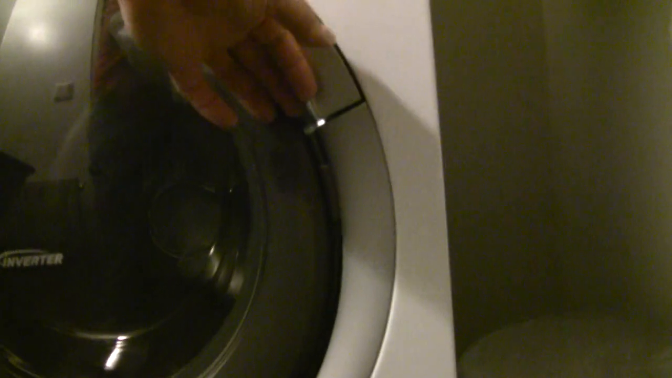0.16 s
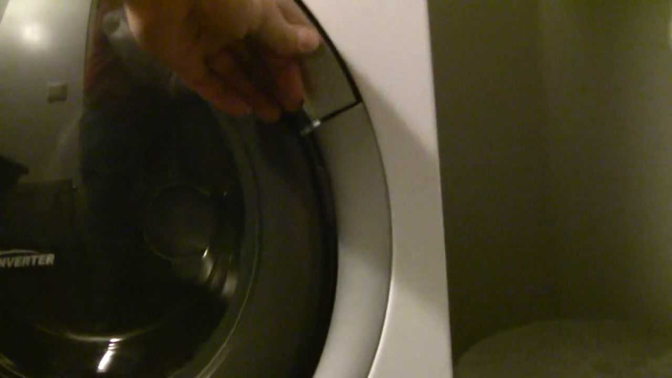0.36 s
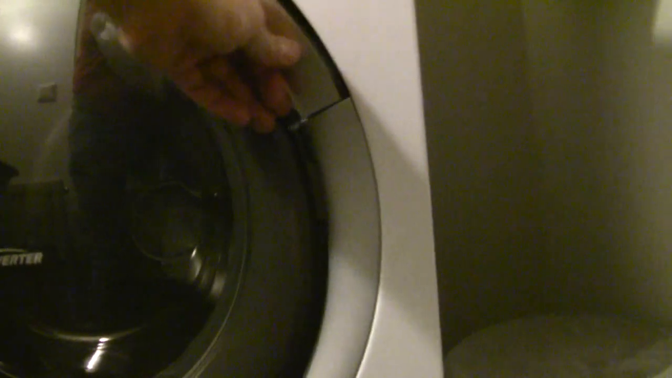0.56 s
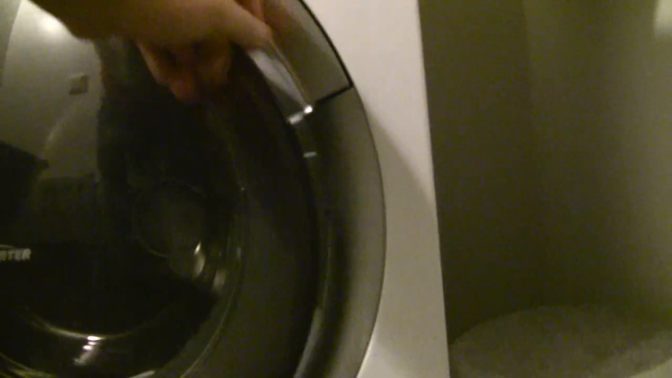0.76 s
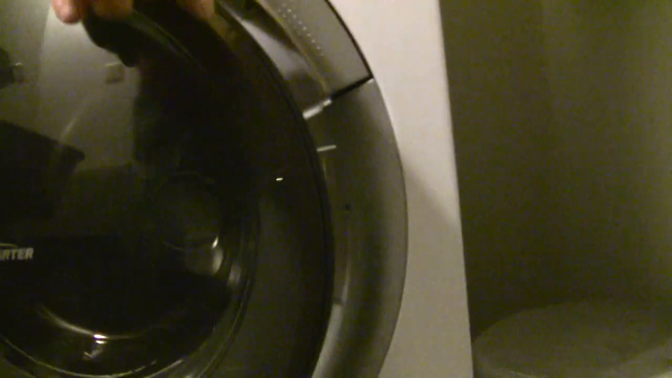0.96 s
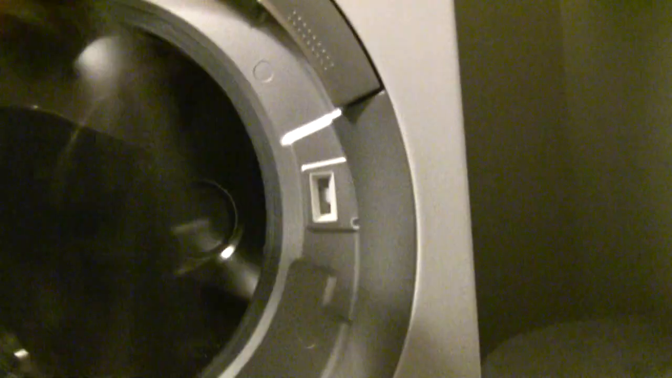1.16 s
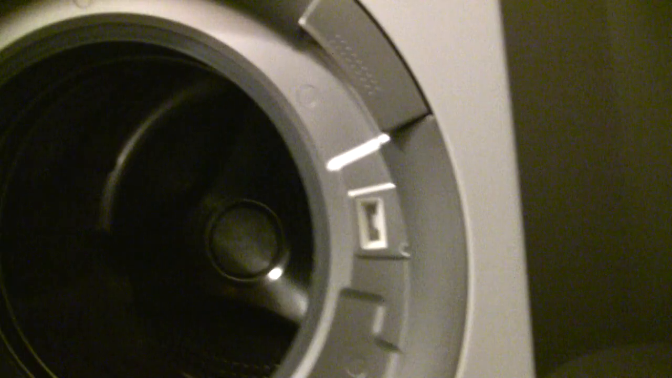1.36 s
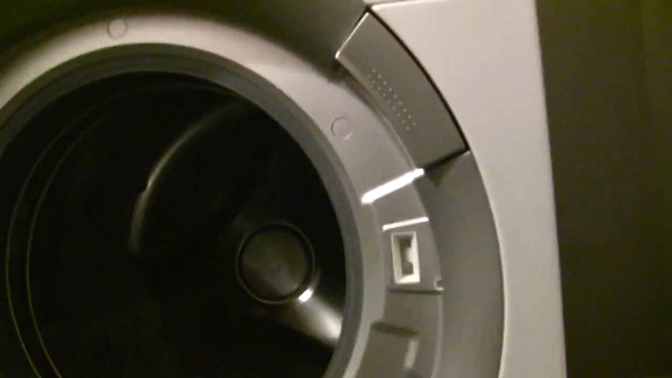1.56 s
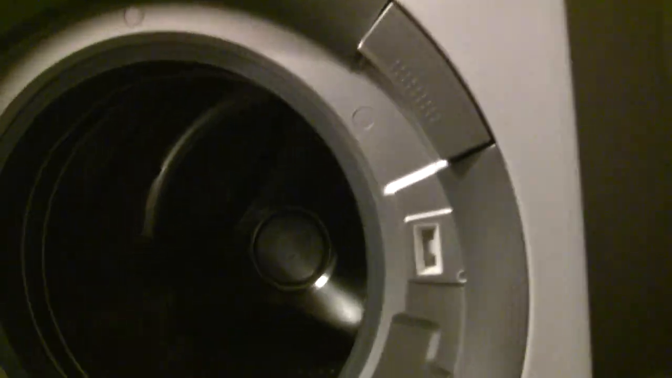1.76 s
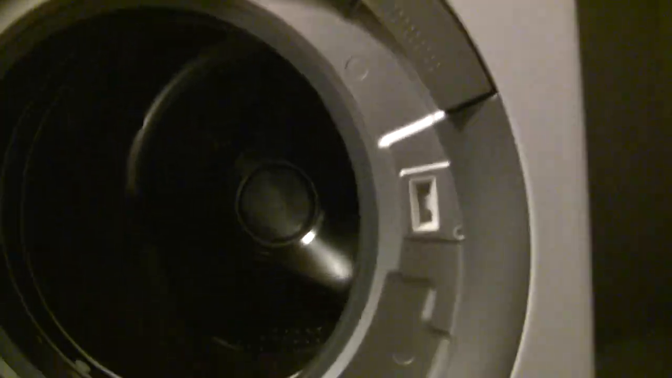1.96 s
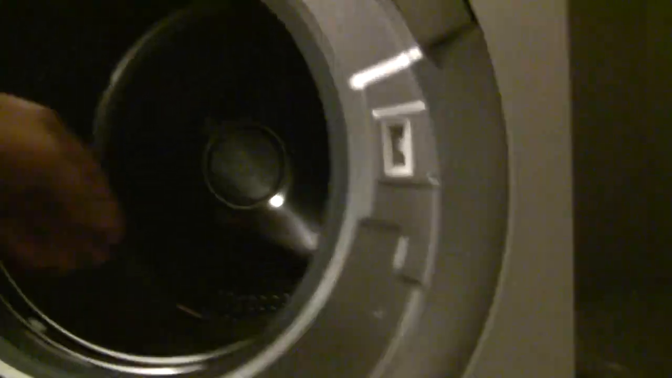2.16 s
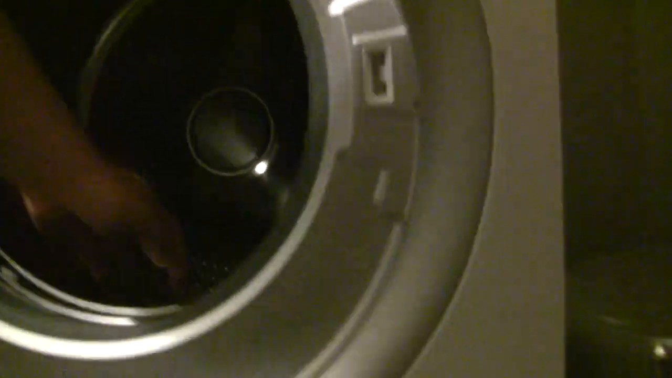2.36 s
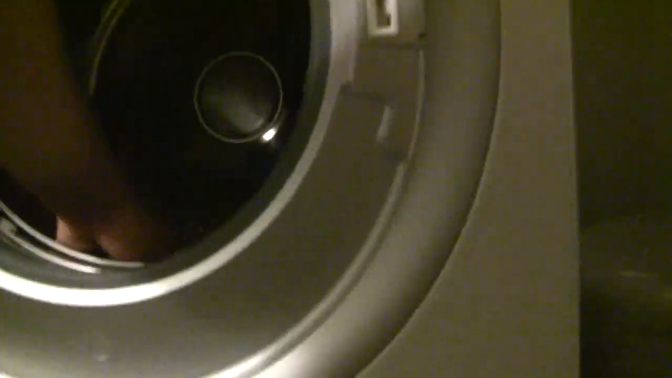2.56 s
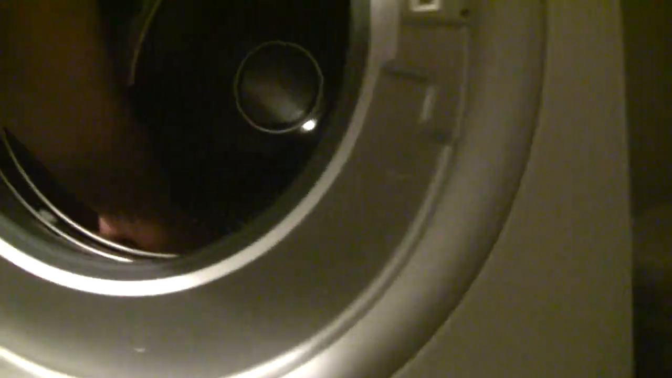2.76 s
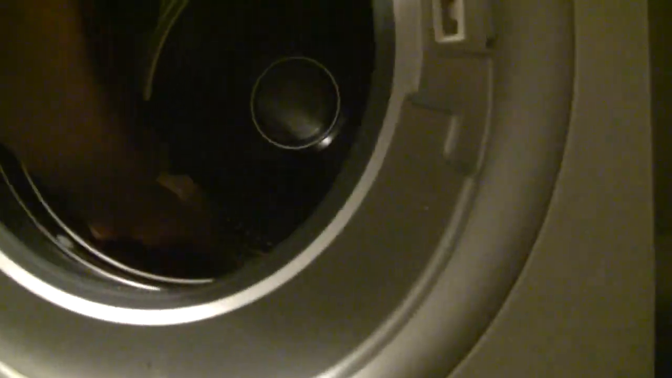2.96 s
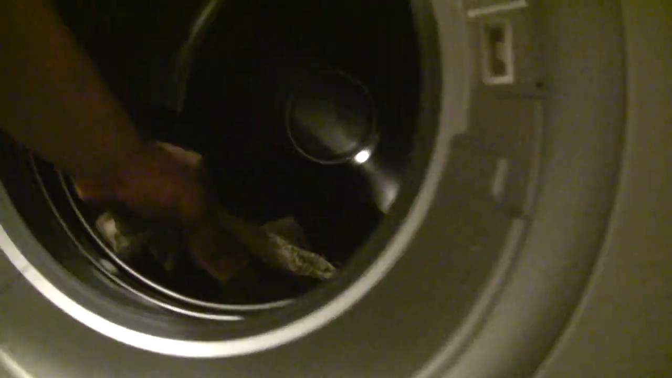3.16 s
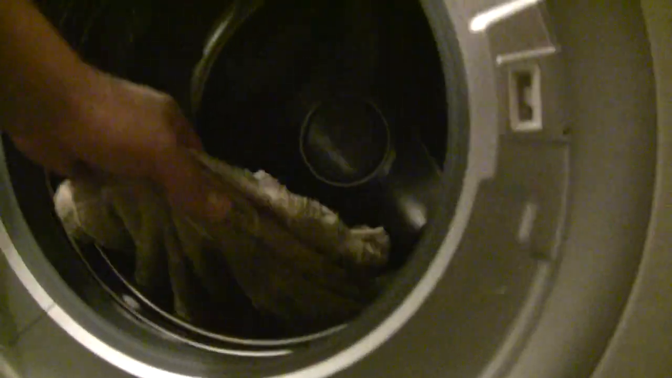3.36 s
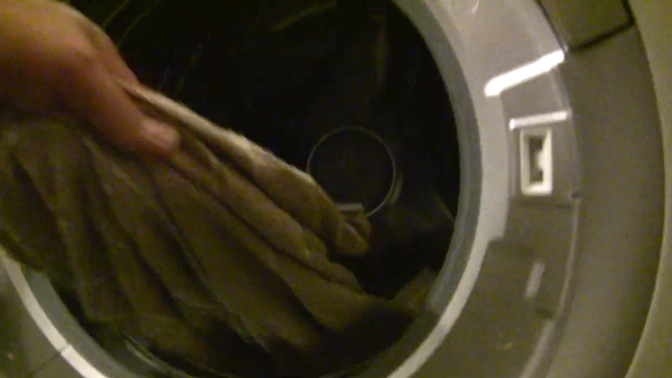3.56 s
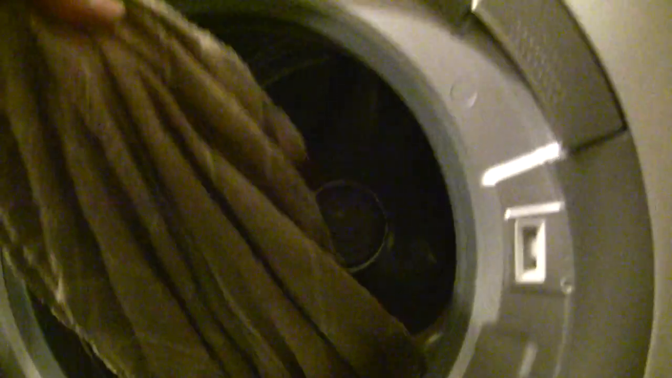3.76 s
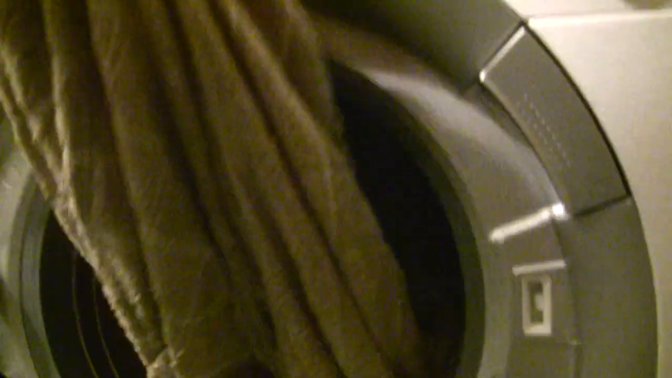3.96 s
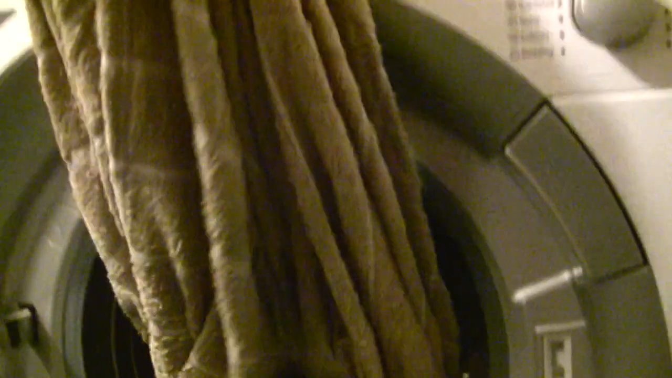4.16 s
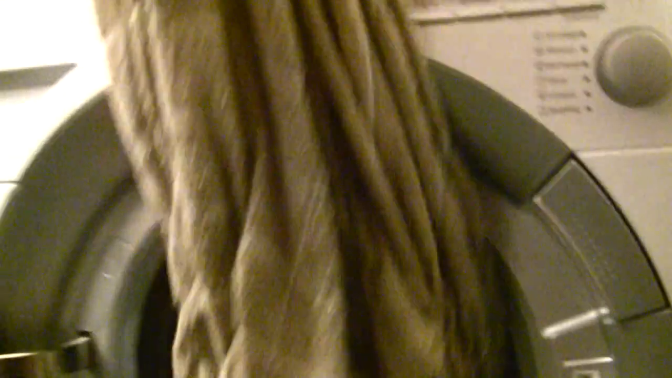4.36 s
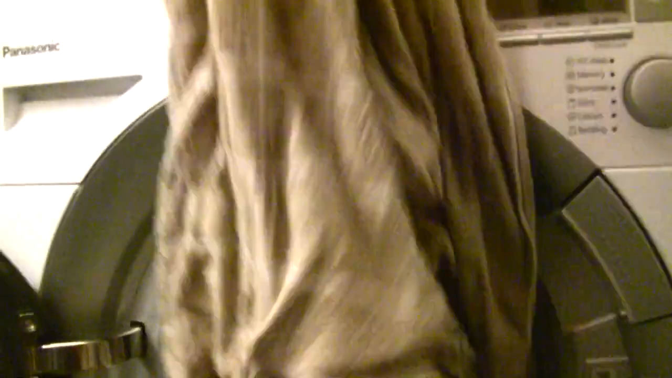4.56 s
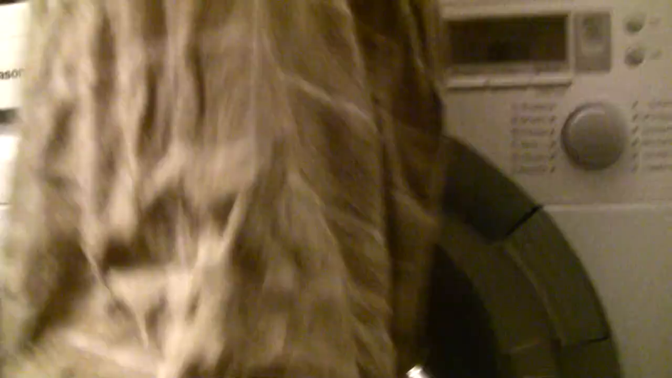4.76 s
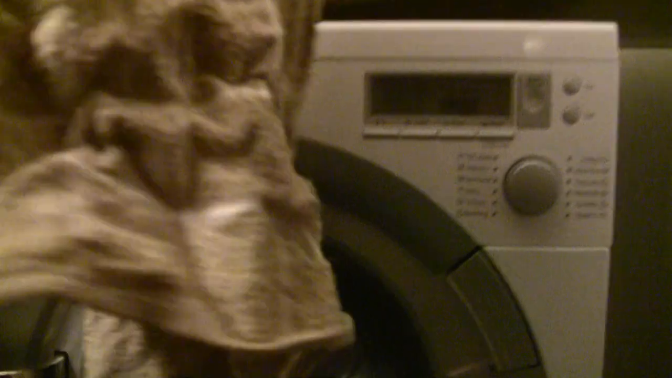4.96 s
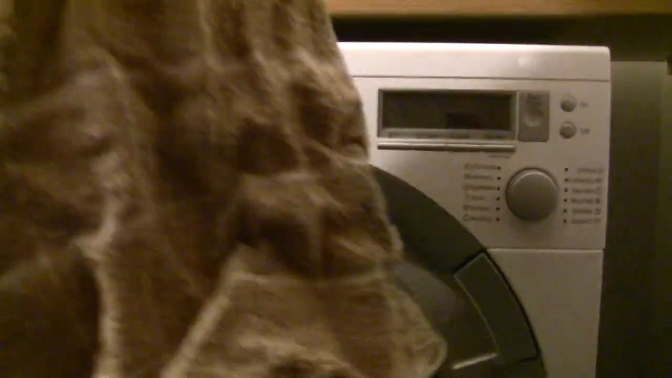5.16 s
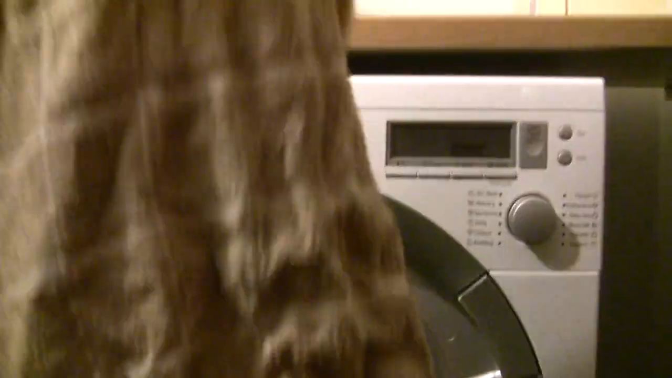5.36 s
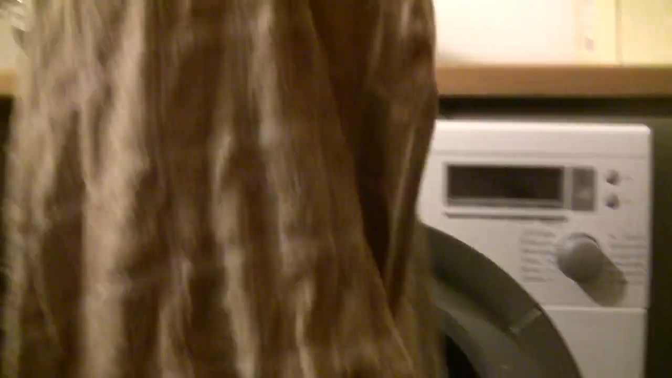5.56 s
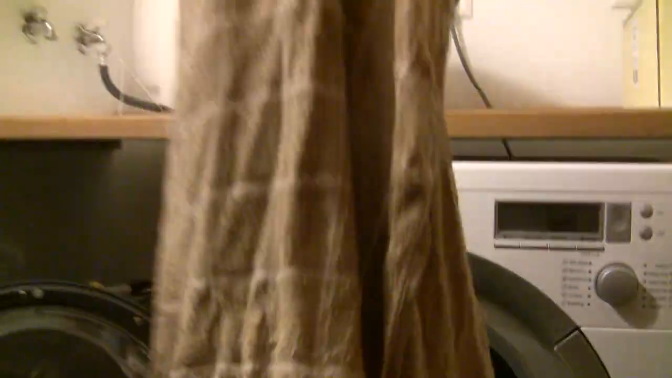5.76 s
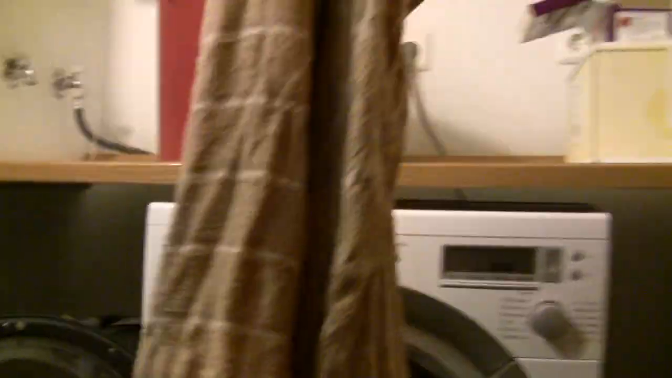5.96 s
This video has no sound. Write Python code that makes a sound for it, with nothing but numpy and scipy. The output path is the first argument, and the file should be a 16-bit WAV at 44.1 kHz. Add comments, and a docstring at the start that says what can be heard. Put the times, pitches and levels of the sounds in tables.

```python
"""Opening a washing machine

In a small laundry room with hard walls, a washing machine door is opened close to the microphone.
The handle spring ticks, the latch hook snaps back, the door bumps and its glass leaves the rubber seal.
A hand knocks about in the steel drum. Every blow makes the struck part ring and the room echo.
Then a sheet is drawn out: it swishes against itself, rubs over the rim and flaps."""
import sys
import numpy as np
from scipy import signal
from scipy.fft import rfft, irfft, next_fast_len
from scipy.io import wavfile

SR = 44100
rng = np.random.default_rng(int(sys.argv[2]) if len(sys.argv) > 2 else 0)


def generate_wav(sig):
    """Save sig (samples, or channels by samples) to the path in sys.argv[1] as 16-bit PCM at SR."""
    pcm = np.round(np.clip(np.atleast_2d(sig).T, -1, 1) * 32767).astype(np.int16)
    wavfile.write(sys.argv[1], SR, pcm)


N = 265305
TIME = np.arange(N) / SR

# The notes of the steel drum. Each row: pitch in Hz, level in dB, ring time in seconds.
DRUM_NOTES = [(70.4, 17.5, 0.49), (81.4, 6, 0.57), (224, 3, 0.14), (247.6, 3, 0.34), (278.6, 4.5, 0.26),
              (370.5, -3, 0.26), (484.5, 6.5, 0.27), (549, -9, 0.26), (688, -4, 0.42), (934, -4, 0.078),
              (1137, 2, 0.12), (1266, -7.5, 0.22), (1382, -8, 0.14), (1579, 0, 0.12), (2420, -4, 0.08)]


def latch_hook():
    """The latch lets go and its hook snaps back in a quick run of ringing clicks."""
    # Each row: start and contact time in seconds, then echo, strength, thump and brightness in dB.
    snaps = [(0.7063, 0.0045, -2.5, -32, -5, -1), (0.7094, 0.0019, -2, -23.5, 2.5, 0.5),
             (0.7123, 0.0016, -2, -24, 3.5, 0), (0.863, 0.0055, -5, -37.5, -21, -7)]
    # Each row: pitch in Hz, level in dB, ring time in seconds.
    notes = [(1146, 1.5, 0.11), (1430, -6, 0.092), (1620, 2, 0.22), (1668, 5, 0.07), (1714, 6, 0.21),
             (1920, -7.5, 0.53), (1880, -3, 0.18), (2990, -4, 0.059), (3456, -17, 0.21), (3670, -13, 0.24),
             (4550, -16, 0.11), (5810, -6, .11)]
    # Each row: frequency in Hz, level in dB.
    tone = [(72, -32), (210, -31), (550, -14), (1340, 0), (3200, -4.5), (7100, -13.5), (12600, -29)]
    return blows(snaps, notes, tone, gain_db=2.0, ring_db=3, rise_s=0.0012, grit=0.17)


def handle_spring():
    """The spring in the handle ticks once and rings brightly."""
    # Each row: start and contact time in seconds, then echo, strength, thump and brightness in dB.
    ticks = [(0.3905, 0.0056, -2, -27, -1, 0.5)]
    # Each row: pitch in Hz, level in dB, ring time in seconds.
    notes = [(805, 1, 0.14), (2030, -7, 0.19), (2280, -4, 0.33), (2780, -8, 0.17), (3730, -24, .35),
             (4075, -12, 0.19), (5400, -23, .14), (6170, -28, .18), (7360, -23, 0.2), (7900, -11, 0.15),
             (8500, -8, 0.12), (8950, -9, 0.13), (9450, -8, 0.12)]
    # Each row: frequency in Hz, level in dB.
    tone = [(72, -30), (210, -45), (550, -14.5), (1340, -11), (3200, -4), (7100, 0), (12600, -12)]
    return blows(ticks, notes, tone, gain_db=0.5, ring_db=6, rise_s=0.00038, grit=0.22)


def door():
    """The door bumps and rings with low notes."""
    # Each row: start and contact time in seconds, then echo, strength, thump and brightness in dB.
    bumps = [(0.089, 0.012, -16, -51, 12, -8), (0.172, 0.0063, -4, -56, 13, -1),
             (0.4977, 0.0038, -4, -19.5, -3, -0.5), (0.634, 0.017, 29, -42.5, 7, -7.5),
             (0.783, 0.018, 2, -37.5, 4.5, -21), (0.9092, 0.012, -2, -33.5, -2, -3.5),
             (1.17, 0.02, 2, -60, 18, -10), (1.361, 0.0096, -3, -57.5, 22.5, -31),
             (1.757, 0.003, -6, -46.5, 4, -35)]
    # Each row: pitch in Hz, level in dB, ring time in seconds.
    notes = [(84.4, 12.5, 0.43), (219, 13, 0.43), (246, 15, 0.24), (301.6, 7.5, 0.5), (375.3, 7, 0.29),
             (409.4, 5, 0.21), (565, 3.5, 0.25), (686, 2.5, 0.19), (758, 1, 0.18), (1024, 2, 0.12),
             (1235, 0.5, 0.18), (1304, 1, 0.29), (1362, 5, 0.051), (1574, -6.5, 0.35)]
    # Each row: frequency in Hz, level in dB.
    tone = [(72, -13.5), (210, -10.5), (550, -3), (1340, -0.5), (3200, -4.5), (7100, -7.5), (12600, -9)]
    return blows(bumps, notes, tone, gain_db=0.5, ring_db=-2, rise_s=0.00041, grit=0.36)


def rubber_seal():
    """The rubber groans as it unsticks, then the glass bowl of the door leaves it with a thud."""
    # Each row: start and contact time in seconds, then echo, strength, thump and brightness in dB.
    thuds = [(0.939, 0.01, -7, -24, 0.5, 6), (0.976, 0.011, -2, -44.5, 11.5, 1)]
    # Each row: pitch in Hz, level in dB, ring time in seconds.
    notes = [(86, 12, 0.52), (217.7, -1, 0.62), (304.7, 0.5, 0.34), (409, -8, 0.83), (487, 4, 0.058),
             (531, 3.5, 0.14), (662, 2, 0.13)]
    # Each row: frequency in Hz, level in dB.
    tone = [(72, -19.5), (210, -8.5), (550, -1), (1340, -17), (3200, -36), (7100, -43), (12600, -47)]
    groan = resonance(hz=129, width_hz=24, db=-37.5) * swell(peak_s=0.675, rise_s=0.046)
    return groan + blows(thuds, notes, tone, gain_db=1.5, ring_db=3.5, rise_s=0.0025, grit=0.3)


def hand_in_drum():
    """A hand knocks against the steel drum and sets it ringing."""
    # Each row: start and contact time in seconds, then echo, strength, thump and brightness in dB.
    knocks = [(2.063, 0.012, 2, -40.5, 3, -4), (2.436, 0.012, 7, -48, -1.5, -21),
              (2.582, 0.0098, -3, -51.5, -12, 4), (2.6869, 0.0053, -1.5, -20, -0.5, 1),
              (2.706, 0.0065, -6, -31.5, 12, -14), (2.738, 0.0083, -12, -47, 13, -4),
              (2.827, 0.0036, -7, -38, -4, -5), (2.842, 0.017, -2, -36, 8.5, -22),
              (3.134, 0.0096, -1, -38, 3.5, -13), (3.23, 0.016, 7, -67, 20, 23),
              (3.46, 0.011, -7, -54.5, 9, -13), (4.301, 0.0078, 2, -51, 3, -13),
              (4.32, 0.018, -4, -57.5, 18, -7)]
    # Each row: frequency in Hz, level in dB.
    tone = [(72, -9), (210, -1.5), (550, -1.5), (1340, -0.5), (3200, -8), (7100, -12.5), (12600, -21.5)]
    return blows(knocks, DRUM_NOTES, tone, gain_db=1, ring_db=2.5, rise_s=0.0011, grit=0.33)


def sliding_cloth():
    """Sleeve and sheet swish as they slide, and their fine fibres add a high sizzle."""
    # Steady sliding. Each row: time in seconds, swish in dB, sizzle in dB.
    slide = [(1.1, -71, -71), (1.9, -64, -71), (2.3, -56, -67), (2.65, -55, -68), (3.05, -58, -63.5),
             (3.4, -61, -66), (3.52, -55.5, -57), (4.05, -58, -58.5), (4.35, -53.5, -61),
             (4.65, -49.5, -56), (4.82, -60, -64.5), (5.2, -72.5, -80), (6.0, -55.5, -64)]
    # Quick strokes of cloth on cloth. Each row: peak and rise time in seconds, swish and sizzle in dB.
    strokes = [(1.215, 0.05, -56.5, -63), (1.58, 0.035, -55, -70), (1.82, 0.031, -54.5, -70),
               (2.145, 0.055, -52, -57), (4.225, 0.046, -48.5, -54), (4.51, 0.039, -52.5, -64),
               (4.72, 0.034, -50.5, -50.5), (4.99, 0.074, -58, -62.5), (5.395, 0.042, -55.5, -60),
               (5.67, 0.077, -57, -71), (5.917, 0.022, -49, -54)]
    # Each row of both tones: frequency in Hz, level in dB.
    swish_tone = [(600, -17), (1400, 0), (2500, -2.5), (4200, -4.5), (6200, -5.5), (8000, -12.5),
                  (11000, -13.5), (15500, -29)]
    sizzle_tone = [(4000, -29), (7500, 3), (9000, 1), (12000, 2), (15500, -0.5)]
    swish = friction(swish_tone, flutter_db=1.7, flutter_rate=55, grain=0.25)
    swish *= np.hypot(fader(slide, column=1), swells(strokes, column=2))
    sizzle = friction(sizzle_tone, flutter_db=1.0, flutter_rate=130, grain=0.45)
    sizzle *= np.hypot(fader(slide, column=2), swells(strokes, column=3))
    return gain(1.5) * swish + sizzle


def dragging_sheet():
    """The sheet rubs on the drum and rim, while its loose folds flap and push the air."""
    # Steady dragging. Each row: time in seconds, level in dB.
    drag_levels = [(3.0, -55.5), (3.35, -54.5), (3.75, -50.5), (4.05, -56.5), (4.28, -52), (4.55, -47.5),
                   (4.78, -53.5), (5.1, -71), (6.0, -60)]
    # Folds slip over the rim. Each row: peak and rise time in seconds, rubbing and flapping in dB.
    folds = [(4.355, 0.029, -46.5, -57), (4.485, 0.038, -42.5, -43.5), (4.565, 0.027, -49, -43.5),
             (4.635, 0.034, -43.5, -50), (5.77, 0.025, -59, -51.5)]
    # Each row of both tones: frequency in Hz, level in dB.
    rub_tone = [(200, 0.5), (350, 0), (450, 3), (720, 5), (1000, -1.5), (1330, 1), (1800, -16), (3500, -28),
                (8000, -56)]
    flap_tone = [(35, -22), (65, -16), (95, 4), (165, -12.5), (240, -1), (330, -6.5), (600, -12),
                 (2000, -80)]
    drag = fader(drag_levels, column=1)
    rub = friction(rub_tone, flutter_db=2.5, flutter_rate=70, grain=0.61)
    rub *= np.hypot(drag, swells(folds, column=2))
    flap = friction(flap_tone, flutter_db=0.0, flutter_rate=25, grain=0.18)
    flap *= np.hypot(gain(-1.5) * drag, swells(folds, column=3))
    return rub + gain(-1) * flap


def hem_on_drum():
    """The hem of the sheet taps the drum, which rings softly."""
    # Each row: start and contact time in seconds, then echo, strength, thump and brightness in dB.
    taps = [(3.7, 0.011, -4, -42, 4, -15), (3.775, 0.016, 0, -36.5, -1.5, 0),
            (3.842, 0.014, -6, -43.5, 8, 10), (3.86, 0.0082, -9, -47, 5, -6)]
    # Each row: frequency in Hz, level in dB.
    tone = [(72, -15), (210, -19), (550, -1), (1340, -6), (3200, -11), (7100, -30), (12600, -31)]
    return blows(taps, DRUM_NOTES, tone, gain_db=0.5, ring_db=-2, rise_s=0.00085, grit=0.57)


def hem_on_plastic():
    """The hem flicks the plastic front, which hardly rings."""
    # Each row: start and contact time in seconds, then echo, strength, thump and brightness in dB.
    flicks = [(3.497, 0.0046, -4, -54, 8, 3.5), (5.352, 0.0012, -7, -53, -4, -13),
              (5.5672, 0.0014, -11, -47, 3, -1.5), (5.64, 0.016, -3, -55, -2, -3),
              (5.905, 0.013, -4, -53.5, -6, 4)]
    # Each row: pitch in Hz, level in dB, ring time in seconds.
    notes = [(810, -6, 0.049), (1830, -8, 0.022), (2770, 2, 0.019)]
    # Each row: frequency in Hz, level in dB.
    tone = [(72, -24), (210, -14), (550, -6), (1340, 0), (3200, 0), (7100, -5.5), (12600, -13)]
    return blows(flicks, notes, tone, gain_db=0.5, ring_db=-1, rise_s=0.0013, grit=0.15)


def fingers():
    """Fingers rub the plastic handle twice and bring out its hollow tone."""
    hollow = resonance(hz=254, width_hz=63, db=-41.5) + resonance(hz=432, width_hz=180, db=-50.5)
    return hollow * np.hypot(swell(peak_s=0.025, rise_s=0.048, db=2), swell(0.12, 0.02, db=-2))


def singing_steel():
    """The drum sings faintly under the sliding cloth, and the rim rings as the sheet leaves it."""
    # Each row: pitch in Hz, width in Hz, level in dB.
    notes = [(1305, 170, -68.5), (2974, 150, -71.5), (3726, 260, -65)]
    # How firmly the cloth touches the drum. Each row: time in seconds, level in dB.
    contact = [(2.9, -2), (3.2, 0.5), (3.6, 1.5), (4.05, 2), (4.5, -12), (4.8, -5), (5.0, -23), (5.2, -60)]
    drum = sum(resonance(*note) for note in notes) * fader(contact, column=1)
    rim = resonance(hz=1236, width_hz=18, db=-58) * swell(peak_s=4.77, rise_s=0.09)
    return drum + rim


def room_echo(t, build_s=0.0055):
    """Many reflections off near walls blur together; the treble comes back weaker and dies first."""
    # Each row: frequency in Hz, seconds the echo takes to fall by 60 dB.
    fade_times = [(60, 0.99), (160, 0.3), (420, 0.46), (1100, 0.28), (2900, 0.25), (7700, 0.25),
                  (15000, 0.19)]
    # What the walls send back. Each row: frequency in Hz, level in dB.
    wall_tone = [(500, 1), (4000, -2), (9000, -5.5), (12000, -3.5), (16000, -19.5)]
    hz = np.arange(len(t) // 2 + 1) * SR / len(t)
    spectrum = rfft(rng.standard_normal((2, len(t)))) * gain(value_at(hz, wall_tone))
    echo = 0
    for centre_hz, fade_s in fade_times:
        share = value_at(hz, [(f, f == centre_hz) for f, _ in fade_times])
        echo = echo + irfft(spectrum * share, len(t)) * np.exp(-np.log(1000) * t / fade_s)
    return normalise(echo * (1 - np.exp(-t / build_s)))


def still_room():
    """Faint steady air noise, with a low drone from the room's resonances."""
    # Each row: frequency in Hz, level in dB.
    air_tone = [(25, -52), (40, 4), (55, 1.5), (85, -1), (165, -7.5), (250, -3), (400, -6.5), (660, -9.5),
                (1050, -12), (1320, -12.5), (2600, -21.5), (5000, -25), (9000, -34), (15500, -36.5)]
    # Each row: pitch in Hz, width in Hz, level in dB.
    drone = [(64, 18, -66.5), (251.8, 45, -62.5)]
    air = gain(-51) * normalise(colour(rng.standard_normal((2, N)), air_tone))
    return air + sum(resonance(*note) for note in drone)


def blows(rows, notes, tone, gain_db, ring_db, rise_s, grit, room_db=-3):
    """Each blow is a brief chatter of contacts, the ring of the struck part and the room's echo."""
    t = np.arange(2 ** 15) / SR
    track = np.zeros((2, N + len(t)))
    for start_s, contact_s, echo_db, strength_db, thump_db, bright_db in rows:
        chatter = rng.standard_normal((2, len(t))) * np.exp(grit * rng.standard_normal(len(t)))
        contact = normalise(chatter * (1 - np.exp(-t / rise_s)) * np.exp(-t / contact_s))
        blow = contact + gain(echo_db + room_db) * room_echo(t) + gain(ring_db) * ring(t, notes)
        i = int(start_s * SR)
        track[:, i:i + len(t)] += shape_blow(blow, tone, strength_db, thump_db, bright_db)
    return gain(gain_db) * track[:, :N]


def ring(t, notes):
    """A struck part rings with its own notes; each falls by 60 dB in its ring time."""
    hz, db, ring_s = np.transpose(notes)[:, :, None]
    waves = np.sin(2 * np.pi * hz * t) * np.exp(-np.log(1000) * t / ring_s)
    # A note's level counts from the chatter in the third of an octave around it.
    chatter_share = hz * (2 ** (1 / 3) - 1) / (SR / 2)
    waves = waves * gain(db) * np.sqrt(chatter_share / np.mean(waves ** 2, axis=1, keepdims=True))
    return rng.choice([-1., 1.], (2, len(notes))) @ waves


def shape_blow(blow, tone, strength_db, thump_db, bright_db):
    """Give a blow the tone of the struck part: heavy ones thump, hard ones are bright, padded ones dull."""
    # The borders between frequency bands, in Hz.
    edges = [40, 130, 350, 850, 2100, 5000, 10000, 16000]
    # For each band, how many seconds at the start of the blow set its level.
    attack_s = [.08, .04, .03, .03, .03, .03, .03]
    bands = list(zip(edges, edges[1:]))
    centres = np.sqrt(np.prod(bands, axis=1))
    thump = value_at(centres, [(200, thump_db), (1130, 0)])
    bright = value_at(centres, [(1280, 0), (11000, bright_db)])
    wanted_db = strength_db + value_at(centres, tone) + thump + bright
    for _ in range(2):  # twice, because the bands overlap
        attacks = [band(blow[:, :int(span * SR)], lo, hi) for (lo, hi), span in zip(bands, attack_s)]
        now_db = [10 * np.log10(np.mean(attack ** 2)) for attack in attacks]
        blow = colour(blow, np.column_stack([centres, wanted_db - now_db]))
    return blow


def friction(tone, flutter_db, flutter_rate, grain):
    """Countless fibres catch and slip, in small surges as the folds pass."""
    fibres = rng.standard_normal((2, N)) * np.exp(grain * rng.standard_normal(N))
    steps = rng.standard_normal(N // 50)
    surges = np.interp(TIME * flutter_rate, np.arange(len(steps)), steps)
    return normalise(colour(fibres * gain(flutter_db * surges), tone))


def resonance(hz, width_hz, db):
    """A rough note made from a narrow band of noise."""
    return gain(db) * normalise(band(rng.standard_normal((2, N)), hz - width_hz / 2, hz + width_hz / 2))


def swell(peak_s, rise_s, db=0, fall_share=0.74):
    """The loudness of one stroke: it grows smoothly, peaks and dies away a little faster."""
    late = (TIME - peak_s) / rise_s
    return gain(db) * np.exp(-np.where(late < 0, late, late / fall_share) ** 2 / 2)


def swells(rows, column):
    """The loudness of several strokes together, with their dB levels in the given column."""
    return np.sqrt(sum(swell(row[0], row[1], row[column]) ** 2 for row in rows))


def fader(rows, column, fade_s=0.093):
    """Follow a column of dB levels over time, fading in before the first row."""
    rows = np.array(rows)
    fade_in = np.clip(1 + (TIME - rows[0, 0]) / fade_s, 0, 1)
    return gain(np.interp(TIME, rows[:, 0], rows[:, column])) * fade_in


def gain(db):
    """Turn decibels into a multiplier."""
    return 10 ** (np.asarray(db) / 20)


def normalise(x):
    """Scale to an average power of 1."""
    return x / np.sqrt(np.mean(x ** 2))


def value_at(hz, points):
    """Read between (Hz, value) points, with octaves evenly spaced."""
    f, value = np.transpose(points)
    return np.interp(np.log(np.maximum(hz, 1)), np.log(f), value)


def colour(x, tone):
    """Turn frequencies up or down along a curve of (Hz, dB) points."""
    n = 2 * next_fast_len(x.shape[-1])
    hz = np.arange(n // 2 + 1) * SR / n
    cepstrum = irfft(np.log(gain(value_at(hz, tone))), n)
    # Folding onto the first half keeps the filter from sounding ahead of its input.
    cepstrum[1:n // 2] *= 2
    cepstrum[n // 2 + 1:] = 0
    return irfft(rfft(x, n) * np.exp(rfft(cepstrum)), n)[..., :x.shape[-1]]


def band(x, lo, hi):
    """Keep the frequencies between lo and hi, in Hz."""
    return signal.sosfilt(signal.butter(3, [lo, hi], "bandpass", fs=SR, output="sos"), x)


def stereo(pair, width):
    """Mix two signals to left and right: alike in the bass, wide in the treble."""
    side = colour(pair[1], width)
    return np.array([pair[0] + side, pair[0] - side])


def scene():
    """Handle, latch, seal and door, then the drum and the sheet, over the quiet room."""
    # Stereo spread. Each row of both: frequency in Hz, level of the sides against the middle in dB.
    machine_width = [(60, -33), (200, -31), (500, -15.5), (1200, -12.5), (2400, -7), (4400, -3.5),
                     (8000, -0.5), (15000, -3)]
    cloth_and_air_width = [(60, -9.5), (200, -3), (1200, -4.5), (4000, -3.5), (8000, -0.5), (15000, 0.5)]
    opening = fingers() + handle_spring() + latch_hook() + door() + rubber_seal()
    machine = opening + hand_in_drum() + hem_on_drum()
    cloth = hem_on_plastic() + sliding_cloth() + dragging_sheet() + singing_steel()
    return stereo(machine, machine_width) + stereo(cloth + still_room(), cloth_and_air_width)


def record(dry, low_cut_hz=43, top_hz=15600):
    """The small microphone loses the deepest bass, rounds the loudest peaks and cuts the top."""
    thin = signal.sosfilt(signal.butter(4, low_cut_hz, "highpass", fs=SR, output="sos"), dry)
    rounded = .9 * np.tanh(thin / .9)
    return signal.sosfilt(signal.ellip(8, .2, 80, top_hz, fs=SR, output="sos"), rounded)


dry = scene()
out = record(dry)
generate_wav(out)
```